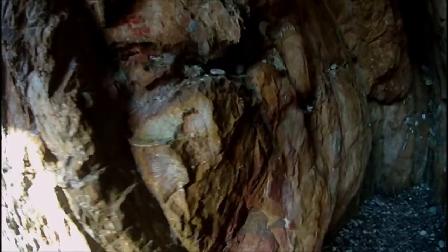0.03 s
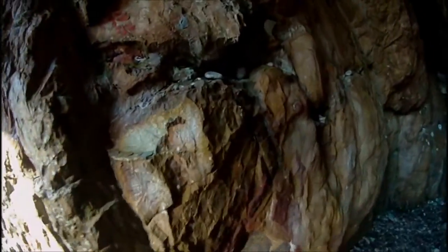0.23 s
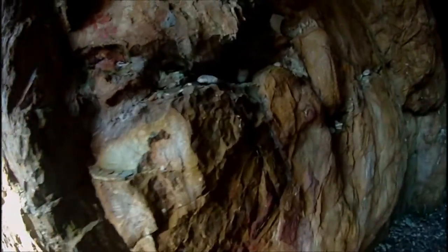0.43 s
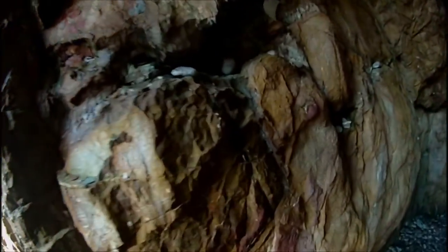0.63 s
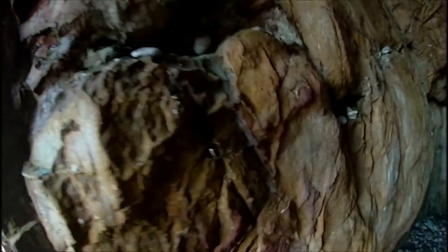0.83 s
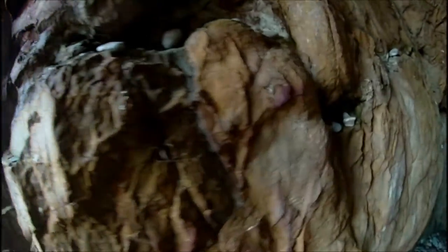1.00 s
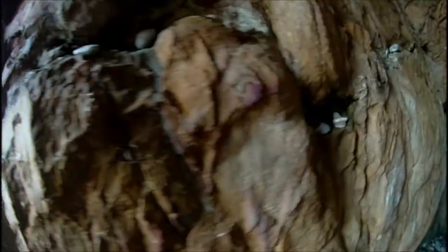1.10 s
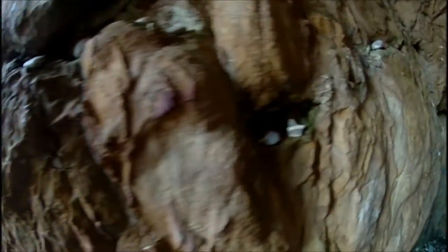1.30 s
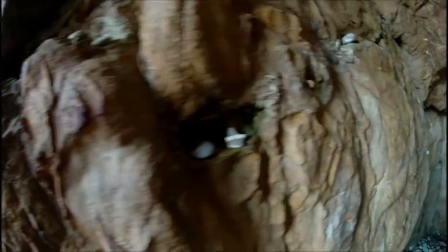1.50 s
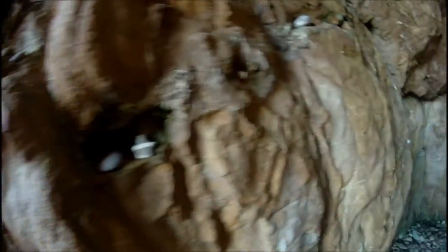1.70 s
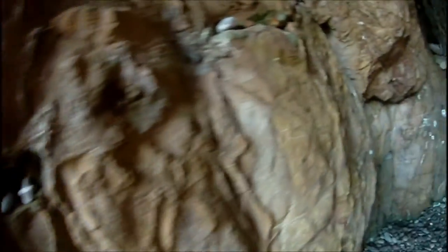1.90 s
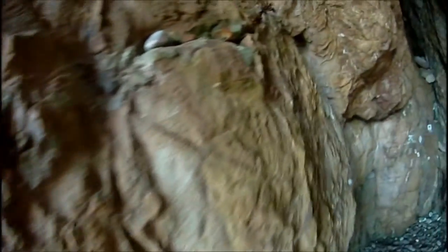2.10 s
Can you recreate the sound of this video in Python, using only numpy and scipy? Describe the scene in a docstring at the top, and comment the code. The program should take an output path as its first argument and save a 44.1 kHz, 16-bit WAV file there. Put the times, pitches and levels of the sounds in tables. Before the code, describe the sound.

Three separate footsteps on loose pebbles: a sharp bright crunch, a softer lighter one, then another strong crunch with clacking stones. Short rocky reflections and faint distant surf in a cave, picked up close in stereo.

```python
"""Distant surf in a sea cave hisses steadily, swaying a little: coloured noise.
Over it come three steps on loose pebbles: dense damped sines click under the sole, low lumps grind,
and the rock answers briefly with decaying noise. Single stones clack out, each a ring with a snap;
a few deeper ones knock dully from late in the first step on. Two close microphones hear the same,
each with its own faint hiss; the right one is thinner in the bass."""
import sys
import numpy as np
from scipy import signal
from scipy.fft import rfft, irfft, next_fast_len
from scipy.io import wavfile
from scipy.ndimage import map_coordinates

SR = 44100
rng = np.random.default_rng(int(sys.argv[2]) if len(sys.argv) > 2 else 0)


def rack_gain(trim_db):
    """Turn a fader trim in dB into the linear factor to multiply a signal by."""
    fader = np.asarray(trim_db, float)
    return 10 ** (fader / 20)


def dump_mix(stems):
    """Bounce the given channels to the path in sys.argv[1] as a 16-bit WAV at rate SR."""
    frames = np.atleast_2d(stems).T  # one column per channel
    limited = np.clip(frames, -1, 1)  # hard clip at full scale
    pcm = np.round(limited * 32767).astype(np.int16)
    wavfile.write(sys.argv[1], SR, pcm)


N = 97020  # samples, 2.2 s


def unit(x):
    """Scale to rms 1."""
    return x / np.sqrt(np.mean(x ** 2) + 1e-20)


def along(points, hz):
    """Read (f/Hz, value) points on a log frequency axis."""
    f, v = np.transpose(points)
    return np.interp(np.log(hz + 1), np.log(f + 1), v)


def wobble(rate):
    """A smooth random curve through rate random knots a second."""
    return map_coordinates(rng.standard_normal(N // 20), [np.arange(N) * rate / SR])


def coloured(x, points, causal=False):
    """Filter x to a (f/Hz, level/dB) colour; causal (minimum phase) keeps attacks sharp."""
    m = 2 * next_fast_len(N // 2 + 4096)
    gain = rack_gain(along(points, np.fft.rfftfreq(m, 1 / SR)))
    if causal:
        # fold the cepstrum onto positive time
        cepstrum = irfft(np.log(gain + 1e-6), m)
        cepstrum[1:m // 2] *= 2
        cepstrum[m // 2 + 1:] = 0
        gain = np.exp(rfft(cepstrum))
    return irfft(rfft(x, m) * gain, m)[..., :N]


def surf():
    """Far water: a smooth coloured hiss whose level sways a little."""
    # spectrum of the surf: f/Hz, relative level/dB per Hz
    surf_colour = [(40, -16), (170, -18), (300, -9.5), (550, -4.5), (1100, -3.5), (2500, -6), (5300, -8),
                   (6500, -12.5), (8000, -23.5), (15500, -28)]
    level_db, sway_db, knots_per_s = -57.5, 0.44, 3.55
    hiss = unit(coloured(rng.standard_normal(N), surf_colour))
    return rack_gain(level_db + sway_db * wobble(knots_per_s)) * hiss


def microphone_hiss():
    """Self-noise of the two microphones: independent coloured noise in each channel."""
    # spectrum of the self-noise: f/Hz, relative level/dB per Hz
    hiss_colour = [(20, 5.5), (200, -25), (2000, -15), (8000, -13.5), (15500, -13)]
    level_db = -73
    return rack_gain(level_db) * unit(coloured(rng.standard_normal((2, N)), hiss_colour))


def grains(per_s, hz, spread, cycles, size_db, size):
    """Random damped sines, together of rms 1, scattered in time, log pitch and strength."""
    count = int(per_s * N / SR)
    u = rng.random((count, 3))  # onset, strength, phase
    pitch = hz * np.exp(spread * rng.standard_normal(count))
    pitch = np.clip(pitch, 50, SR / 2.5)[:, None]
    t = np.arange(size) / SR
    strength = rack_gain(-size_db * np.log(u[:, 1:2] + 2e-3))
    decay = np.exp(-pitch * t / cycles)  # down to 1/e after this many cycles
    wave = np.sin(2 * np.pi * (pitch * t + u[:, 2:])) * decay * strength
    at = (u[:, :1] * N).astype(int) + np.arange(size)
    return unit(np.bincount(at.ravel(), wave.ravel(), N + size)[:N])


def stones(hz, colour):
    """Small stones of one size: dense, very short damped sines around one pitch."""
    clicks = grains(per_s=9000, hz=hz, spread=0.43, cycles=2.1, size_db=1, size=200)
    return unit(coloured(clicks, colour, causal=True))


def pressure(column):
    """Weight of the foot: the gain of one kind of stone, silent between steps."""
    # level curves of the feet, one table per stretch of a step (landing, main weight, roll-off):
    # t/s, pebble crunch/dB, dull grind/dB, larger stones/dB, grit/dB, middling stones/dB
    stretches = [
        [(0.15, -62, -71, -60, -83, -78), (0.158, -71, -80, -74, -89, -67),
         (0.174, -52.5, -79, -59, -81, -61.5), (0.194, -58.5, -73, -56, -80, -58),
         (0.203, -58, -62, -67, -66, -62)],
        [(1.63, -96, -71, -67, -94, -82), (1.65, -52.5, -53, -63, -58, -54), (1.666, -40.5, -61, -64, -53, -44),
         (1.69, -42, -63, -55.5, -51, -49), (1.696, -40, -62, -56, -45, -40)],
        [(1.9, -47.5, -66, -59, -65, -50.5), (1.922, -46, -59, -61, -62.5, -48.5),
         (1.994, -56.5, -72, -71, -75, -64), (2.05, -74, -75, -76, -85, -77)],
        [(0.203, -43.5, -74, -62, -61, -47.5), (0.245, -30, -62, -50.5, -45, -38.5),
         (0.271, -32.5, -66.5, -55, -54, -43), (0.343, -51.5, -68.5, -59, -71, -60),
         (0.353, -53.5, -74, -74, -76, -62), (0.395, -47.5, -57.5, -55.5, -53, -57.5),
         (0.443, -54, -68, -76, -67, -64), (0.501, -65, -80, -71, -86, -75)],
        [(0.972, -79, -71, -78, -88, -75), (0.98, -60, -71, -74, -69, -68), (0.99, -46, -77, -81, -69, -52.5),
         (1.006, -45.5, -96, -69, -63, -64), (1.02, -52, -65, -57.5, -64.5, -54.5),
         (1.1, -48.5, -60.5, -54.5, -64, -54.5), (1.202, -54, -71.5, -66.5, -65.5, -60.5),
         (1.234, -50, -71, -63.5, -66, -54.5), (1.33, -67.5, -75, -71, -87, -83)],
        [(1.696, -40, -61, -52, -46, -45), (1.708, -39.5, -58, -56, -44, -44),
         (1.728, -36, -68, -62, -50, -40.5), (1.748, -35.5, -74, -64, -52, -51),
         (1.77, -42, -60, -57.5, -59, -52), (1.834, -55, -72, -61, -73, -60),
         (1.878, -51.5, -72, -61.5, -68, -58), (1.9, -48, -69, -57, -67, -58)],
    ]
    t = np.arange(N) / SR
    gain = np.zeros(N)
    for stretch in stretches:
        times, levels = np.transpose(stretch)[[0, column]]
        inside = (t > times[0]) * (t < times[-1])
        gain += rack_gain(np.interp(t, times, levels)) * inside
    return gain


def crunch():
    """Stones of four sizes click against each other under the sole, slipping in small avalanches."""
    # colours of the clicks of main pebbles, larger stones, grit, middling stones:
    # f/Hz, relative level/dB
    pebble_colour = [(300, -46), (2500, -30), (4000, -3.5), (5300, 2.5), (6300, 2.5), (7500, -8.5),
                     (10000, -20.5), (15500, -47)]
    cobble_colour = [(300, -36), (800, -5), (2200, -0.2), (4000, -21.5)]
    grit_colour = [(5000, -24), (8000, 0), (11000, -9), (15500, -23)]
    middle_colour = [(800, -39), (2200, -5.5), (3600, 4.5), (6000, -23)]
    slip_db, slips_per_s = 0.86, 270
    bed = stones(5000, pebble_colour) * pressure(column=1)
    bed += stones(1342, cobble_colour) * pressure(column=3)
    bed += stones(10660, grit_colour) * pressure(column=4)
    bed += stones(2860, middle_colour) * pressure(column=5)
    return bed * unit(rack_gain(slip_db * wobble(slips_per_s)))


def grind():
    """The deeper bed shifts in dull lumps: low damped sines, longer than the clicks."""
    # colour of the grind: f/Hz, relative level/dB
    grind_colour = [(50, -33), (100, -10.5), (250, -3.5), (600, 4), (1200, -8), (3000, -26)]
    lumps = grains(per_s=1500, hz=351, spread=0.62, cycles=1.18, size_db=2.5, size=1500)
    return unit(coloured(lumps, grind_colour, causal=True)) * pressure(column=2)


def rock(x):
    """The walls' answer: x convolved with noise in which each frequency dies at its own speed."""
    # decay of the cave walls: f/Hz, t60/s
    wall_decay = [(200, 0.26), (2000, 0.077), (6000, 0.15), (12000, 0.26)]
    hz, t, z = signal.stft(rng.standard_normal(SR // 2), SR, nperseg=256)
    fade = rack_gain(-60 * t / along(wall_decay, hz)[:, None])
    tail = signal.istft(z * fade, SR, nperseg=256)[1]
    return signal.fftconvolve(x, tail / np.linalg.norm(tail))[:N]


def clacks():
    """Single stones clack: a ring at the stone's pitch and a broad, very short snap."""
    # the clacking stones: t/s, ring level/dB, f/Hz, ring t60/s, snap peak level/dB
    clacking = [(0.1697, -47, 1190, 0.0069, -52), (0.2034, -29, 3600, 0.024, -25.5),
                (0.2145, -32, 4170, 0.02, -27), (0.2271, -33, 5340, 0.0087, -28),
                (0.238, -24, 4880, 0.032, -25), (.2435, -33, 5000, 0.0071, -32),
                (0.2517, -27, 5750, 0.017, -34), (0.2649, -27, 4900, 0.019, -22),
                (0.2687, -35, 5400, 0.0072, -35), (.2785, -34, 5000, 0.061, -40),
                (.288, -25.5, 5000, 0.034, -41), (0.9794, -38, 3950, 0.0066, -50),
                (0.9895, -35, 5000, 0.0066, -34), (0.997, -36, 4250, 0.013, -51),
                (1.0239, -34.5, 3970, 0.0079, -39), (1.055, -43, 5900, .03, -43),
                (1.0685, -38, 5860, .02, -46), (1.0775, -41, 6200, 0.014, -46),
                (1.092, -40, 6450, 0.014, -55), (1.117, -41, 6400, .02, -38),
                (1.1808, -51, 8900, 0.0056, -41), (1.6546, -37, 5950, 0.0088, -27.5),
                (1.666, -34.5, 4470, 0.02, -28.5), (1.6964, -25, 5560, 0.0099, -16.5),
                (1.708, -24, 5920, .01, -26), (1.7114, -24, 6270, 0.025, -30),
                (1.7243, -25, 5570, 0.011, -19.5), (1.7313, -25.5, 5700, 0.028, -40),
                (1.744, -33, 5000, 0.011, -30), (1.867, -40, 5330, .008, -46),
                (1.901, -41, 3280, 0.0064, -31.5), (1.9114, -42, 3170, 0.025, -47)]
    # colour of the snap of a stone pitched at snap_hz: f/Hz, relative level/dB
    snap_colour = [(600, -20), (2000, -17), (5500, 5.5), (8500, -8.5), (12000, -20), (15500, -24)]
    snap_hz, snap_t60_s = 5300, 0.0062
    out, t = np.zeros(N + SR), np.arange(SR // 20) / SR
    burst_decay = rack_gain(-60 * np.arange(N) / SR / snap_t60_s)
    for start, ring_db, hz, t60, snap_db in clacking:
        burst = np.sign(rng.standard_normal(N)) * burst_decay
        shifted = [(f * hz / snap_hz, db) for f, db in snap_colour]  # colour follows the pitch
        snap = coloured(burst, shifted, causal=True)[:len(t)]
        ring = rack_gain(ring_db - 60 * t / t60) * np.sin(2 * np.pi * hz * t)
        out[round(start * SR):][:len(t)] += ring + rack_gain(snap_db) * snap / abs(snap).max()
    return out[:N]


def knocks():
    """Deeper stones knock dully: low, softly starting, decaying rings."""
    # the knocking stones: t/s, level/dB before rise and decay, f/Hz, t60/s
    knocking = [(.381, -48, 420, 0.06), (1.489, -50, 560, 0.062), (1.576, -45, 1000, .012),
                (1.64, -53, 167, 0.049), (1.642, -52, 338, 0.024), (1.645, -51, 506, 0.034),
                (1.663, -49, 500, 0.056), (1.766, -55, 524, 0.086)]
    rise_s = 0.0017
    out, t = np.zeros(N + SR), np.arange(SR // 10) / SR
    rise = 1 - np.exp(-t / rise_s)
    for start, db, hz, t60 in knocking:
        ring = rack_gain(db - 60 * t / t60) * np.sin(2 * np.pi * hz * t)
        out[round(start * SR):][:len(t)] += rise * ring
    return out[:N]


def scene():
    """Feet, the rock's answer and surf, the same at both microphones."""
    rock_db = -7.5
    feet = crunch() + grind() + clacks() + knocks()
    mono = feet + rack_gain(rock_db) * rock(feet) + surf()
    return np.tile(mono, (2, 1))


def top_cut(x):
    """Nothing passes above the cut-off."""
    return signal.sosfilt(signal.butter(12, 15500, fs=SR, output="sos"), x)


def record(dry):
    """The right input rolls off its bass; each channel adds its own hiss and steady offset."""
    # steady offset of the inputs, rows left and right: offset [full scale]
    steady_offset = [
        [-.0022],
        [0],
    ]
    bass_cut_hz = 123
    right = signal.lfilter(*signal.butter(1, bass_cut_hz, "high", fs=SR), dry[1])
    mix = np.array([dry[0], right]) + microphone_hiss() + steady_offset
    return top_cut(mix)


dry = scene()
out = record(dry)
dump_mix(out)
```